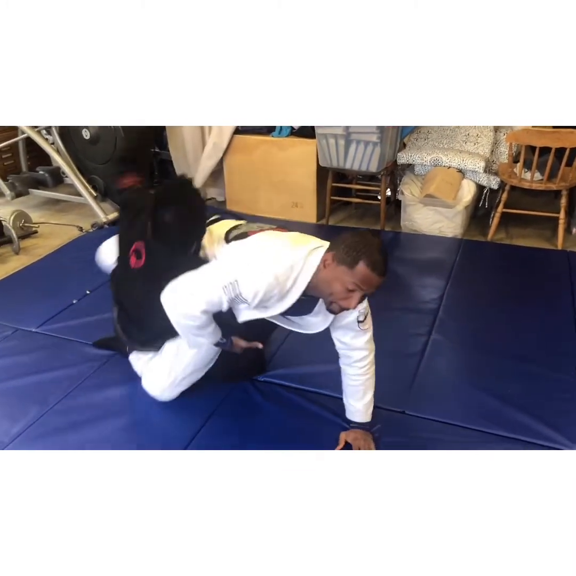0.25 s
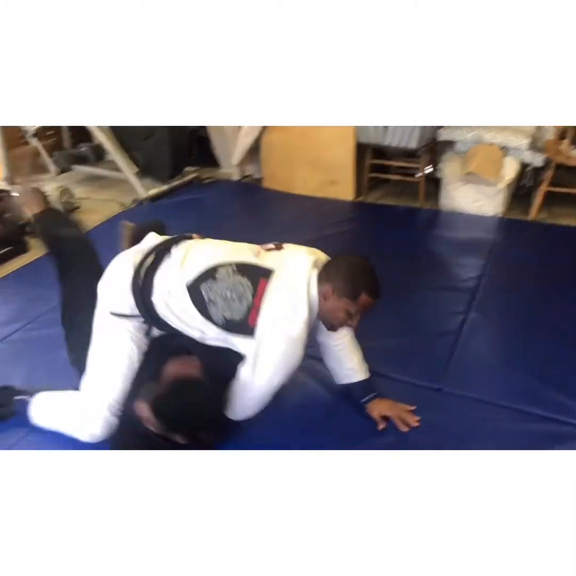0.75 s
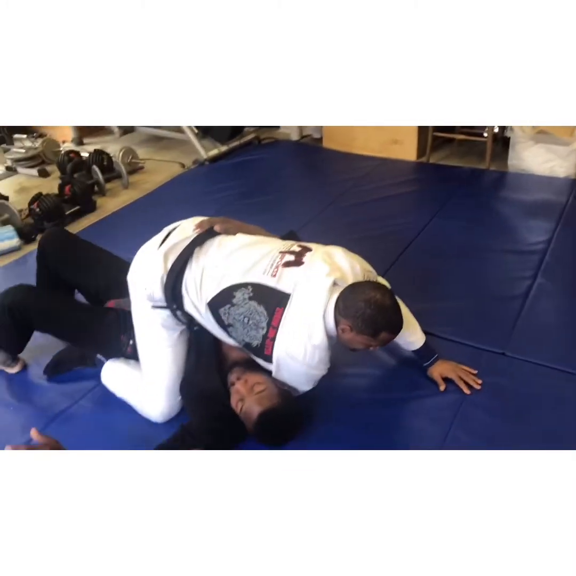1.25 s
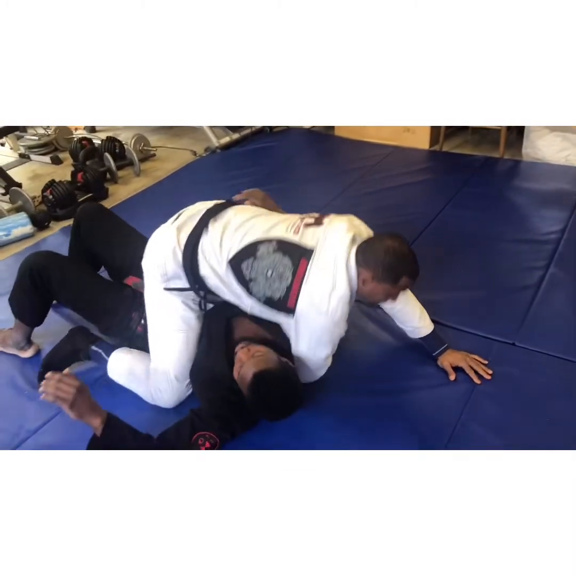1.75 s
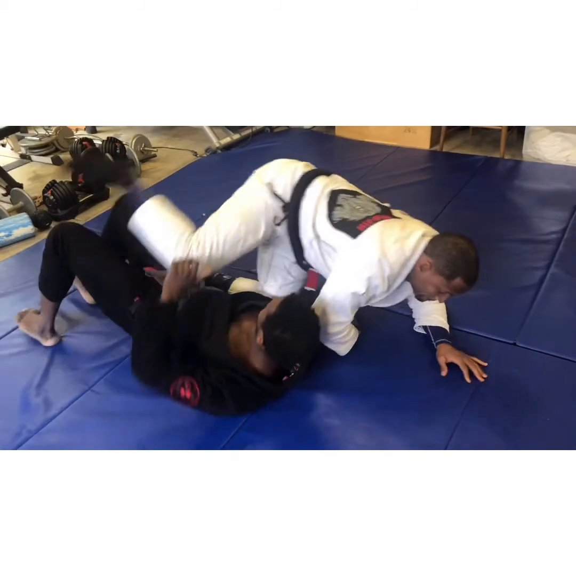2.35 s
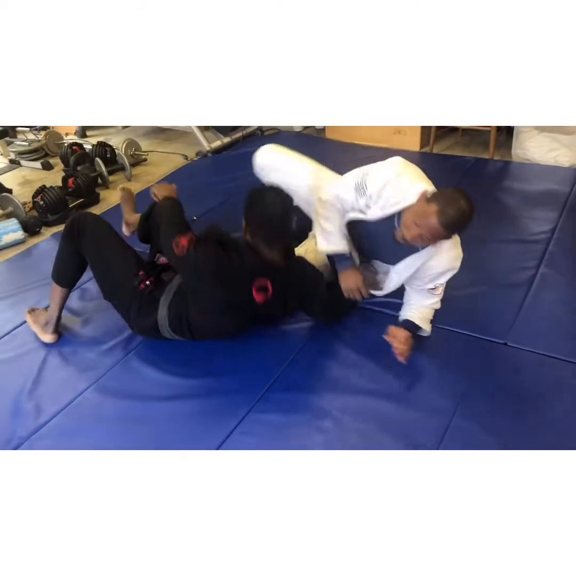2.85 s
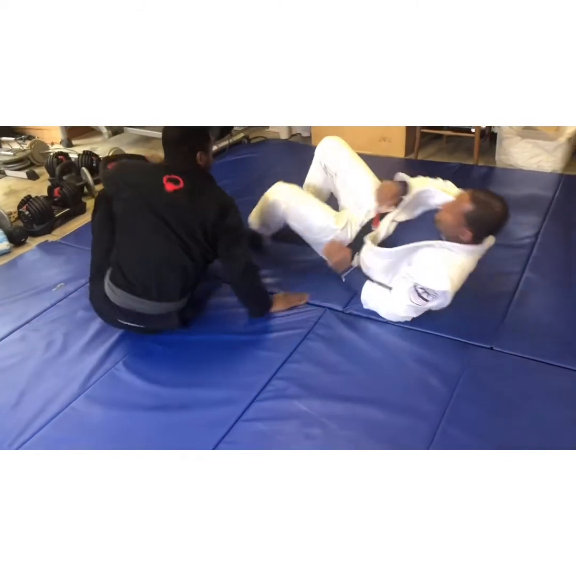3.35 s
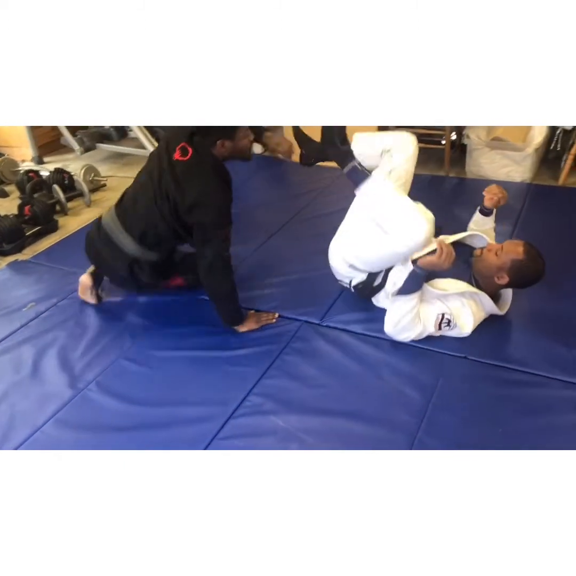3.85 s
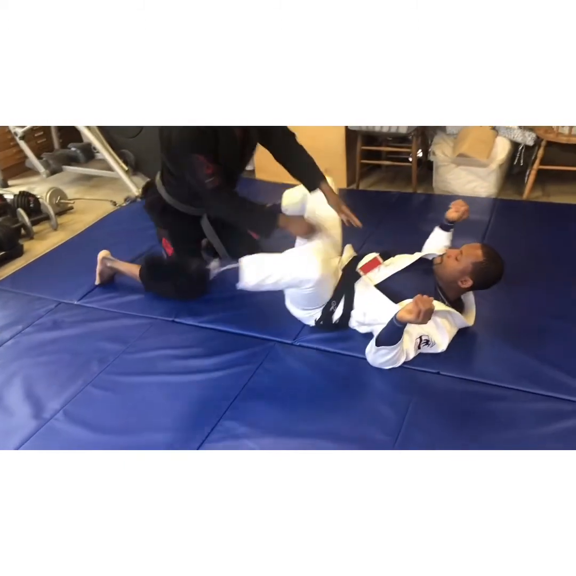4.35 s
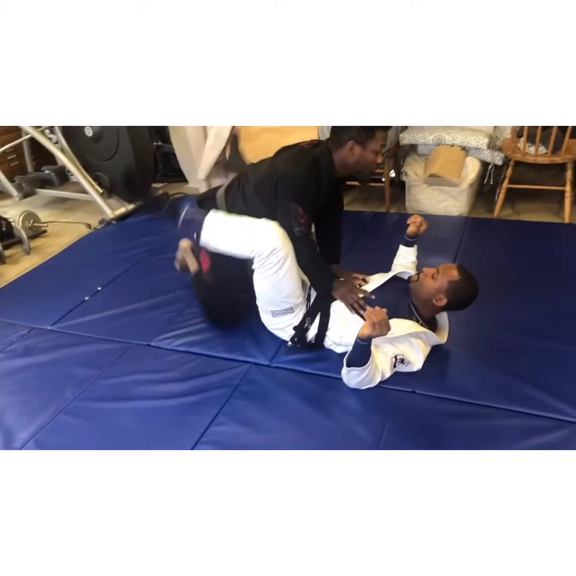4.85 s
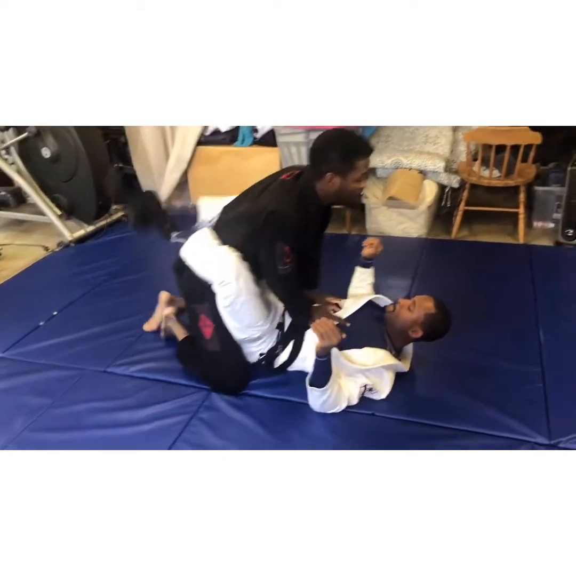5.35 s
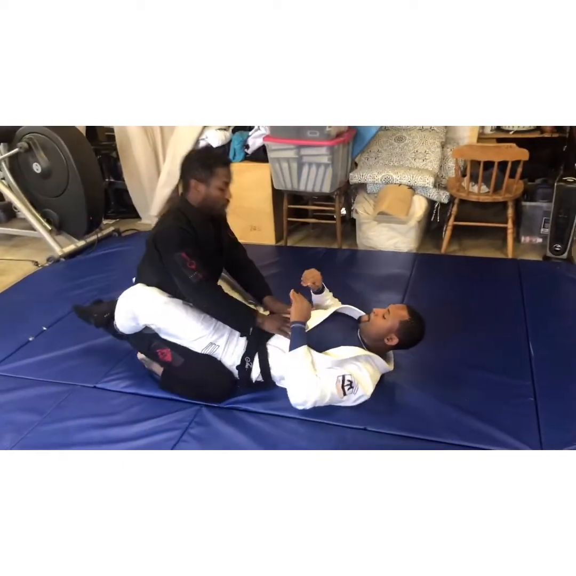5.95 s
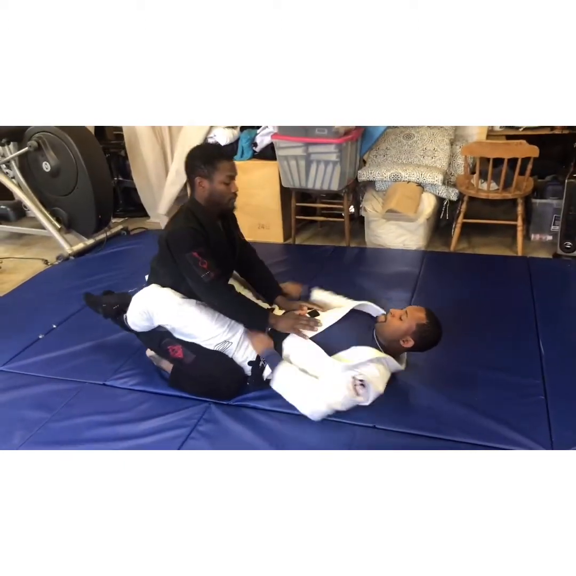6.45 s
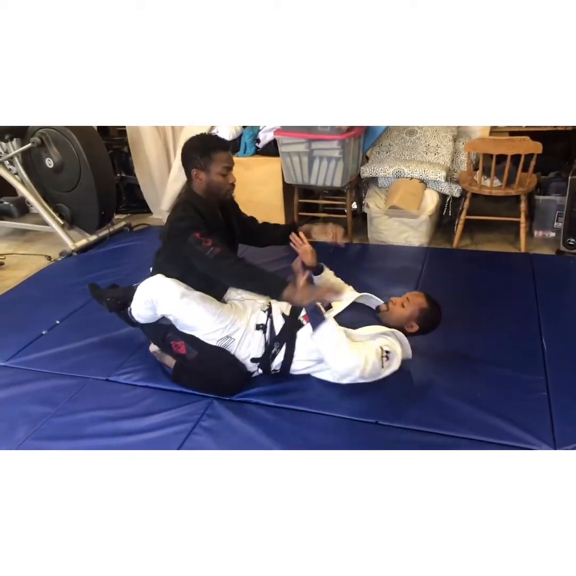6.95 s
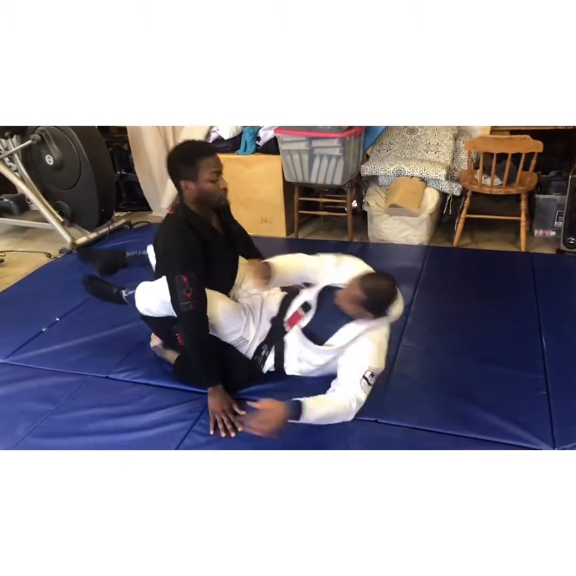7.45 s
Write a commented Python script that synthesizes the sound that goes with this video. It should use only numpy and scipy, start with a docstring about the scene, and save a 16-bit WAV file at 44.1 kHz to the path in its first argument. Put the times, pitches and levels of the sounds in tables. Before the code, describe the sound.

A heavy double slam onto mats near the start, followed by scuffling cotton jackets, soft knee and hand thuds, quiet gripping and a late thud.

```python
"""A cluttered basement room: two grapplers roll on foam mats near a phone microphone.
Bodies and limbs land as resonant noise bursts that ring decaying floor modes under the mats.
Heavy cotton jackets snap as short pitched bursts; they crumple, rasp and slide over the vinyl
as stick-slip noise, with low drag and rumble; one level curve, dipping after the big slam, steers them.
Decaying noise tails make the room answer each blow and snap; a faint air noise lies under it all."""
import sys
import numpy as np
from scipy import signal
from scipy.fft import rfft, irfft, next_fast_len
from scipy.io import wavfile
from scipy.ndimage import uniform_filter1d

SR = 44100
rng = np.random.default_rng(int(sys.argv[2]) if len(sys.argv) > 2 else 0)


def int16_out(signal):
    """Quantize to a 16-bit WAV file."""
    q = np.round(np.clip(np.atleast_2d(signal).T, -1, 1) * 32767)
    wavfile.write(sys.argv[1], SR, q.astype(np.int16))


N = 340011  # samples
REF_DB = -50  # reference for the rubbing level and for the slide hiss

# jackets gripped and wrung: (hardest at [s], crumpling level [dB], tightening [s], easing [s],
# seam rasp level [dB])
GRIPS = [(.02, -55, .04, 0.12, -55.5), (.32, -47, 0.066, 0.11, -57), (.58, -47, .04, 0.038, -47),
         (2.7, -46, 0.062, 0.065, -52.5), (3.06, -52, 0.045, 0.044, -71), (3.57, -46, 0.42, 0.057, -57),
         (3.92, -44.5, 0.074, 0.1, -55), (4.45, -63, .03, 0.067, -55), (4.72, -56, .015, 0.022, -60),
         (5.31, -51, 0.064, .04, -68), (5.42, -52.5, .04, 0.089, -51), (5.52, -48, 0.068, 0.023, -60),
         (5.65, -47.5, 0.024, 0.061, -57), (6.3, -60.5, 0.037, .04, -64), (6.51, -59.5, 0.16, 0.089, -62.5),
         (6.9, -54.5, 0.031, .07, -56.5), (7.25, -54, 0.034, 0.067, -49.5),
         (7.42, -45.5, 0.036, 0.14, -51.5)]


def amp(db):
    """Logarithmic level: decibels to amplitude gain."""
    return 10 ** (np.asarray(db) / 20)


def unit(x):
    """Power normalisation: scaled to rms 1."""
    return x / np.sqrt(np.mean(x ** 2) + 1e-20)


def peaked(x):
    """Peak normalisation: scaled to peak 1."""
    return x / np.abs(x).max()


def along(points, hz):
    """Log-frequency interpolation of (frequency [Hz], value) points."""
    f, v = np.transpose(points)
    return np.interp(np.log(hz + 1), np.log(f + 1), v)


def filtered(x, response):
    """Linear filtering: the spectrum of x times a response of frequency."""
    m = next_fast_len(len(x) + 8192)
    hz = np.fft.rfftfreq(m, 1 / SR)
    return irfft(rfft(x, m) * response(hz), m)[:len(x)]


def resonance(centre_hz, q):
    """Simple resonator: a causal second-order band-pass of peak gain 1."""
    def response(f):
        damping = 1j * f * centre_hz / q
        return damping / (centre_hz ** 2 - f * f + damping)
    return response


def friction(spectrum, grains_per_s, grain_s, grain_share, patchy_db):
    """Stick-slip friction: patchy noise and random slip bursts in one spectral colour, rms 1."""
    z = signal.stft(rng.standard_normal(N + 512), nperseg=512)[2]
    field = uniform_filter1d(rng.standard_normal(z.shape), size=8, axis=0)  # smooth over frequency
    field = uniform_filter1d(field, size=5, axis=1)  # and over time
    noise = signal.istft(z * amp(patchy_db * unit(field)), nperseg=512)[1][:N]

    starts = (rng.random(N) < grains_per_s / SR) * amp(-14 * rng.random(N))
    slips = signal.lfilter([1], [1, -np.exp(-1 / (grain_s * SR))], starts)  # sudden start, quick fade
    bursts = slips * rng.standard_normal(N)

    share = np.clip(grain_share, 0, 1)  # of the power
    mix = np.sqrt(1 - share) * unit(noise) + np.sqrt(share) * unit(bursts)
    return unit(filtered(mix, lambda hz: amp(along(spectrum, hz))))


def swells(rows):
    """Incoherent addition: gain of (peak [s], level [dB], rise [s], fall [s]) bells, powers summed."""
    t = np.arange(0, N, 32) / SR
    power = np.zeros(len(t))
    for s, db, rise, fall in rows:
        flank = np.where(t < s, rise, fall)
        power += amp(2 * db) * np.exp(-2 * ((t - s) / flank) ** 2)
    return np.interp(np.arange(N) / SR, t, np.sqrt(power))


def room(x):
    """Diffuse reverberation: x through a fresh noise tail of energy 1, decaying by frequency."""
    # reverberation of the room: (frequency [Hz], 60 dB decay time [s])
    decay_times = [(100, 0.24), (500, 0.39), (2000, 0.48), (6000, 0.47), (15000, 0.3)]
    hz, t, z = signal.stft(rng.standard_normal(SR // 2), SR, nperseg=256)
    t60 = np.maximum(along(decay_times, hz), .05)[:, None]
    tail = signal.istft(z * amp(-60 * t / t60), SR, nperseg=256)[1]
    tail *= 1 - np.exp(-np.arange(len(tail)) / SR / 0.0044)  # reflections thicken
    return signal.fftconvolve(x, tail / np.linalg.norm(tail))[:len(x)]


def knock(envelope, centre_hz, q, push):
    """Impulsive excitation: a push and its noise through one resonance applied twice, peak 1."""
    force = envelope * rng.standard_normal(len(envelope))
    force[0] = push * np.linalg.norm(force)
    return peaked(filtered(force, lambda f: resonance(centre_hz, q)(f) ** 2))


def air():
    """Stationary background noise: the quiet room and the microphone's own hiss."""
    # colour of the background: (frequency [Hz], relative level [dB])
    air_spectrum = [(15, -41), (25, -48), (59, -7.5), (108, -43.5), (123, -15.5), (145, 14), (166, 11),
                    (1130, -19), (2610, -19), (16000, -50)]
    return amp(-67) * friction(air_spectrum, 18, grain_s=.01, grain_share=.02, patchy_db=-1.7)


def level_over_reference():
    """Level envelope: the course of the rubbing as heard, in dB over REF_DB."""
    # level of the rubbing as heard, dipping after the big slam: (time [s], level [dB])
    rubbing_level = [(0, -45), (.2, -48), (.42, -45.5), (.51, -50), (.62, -39), (.78, -29.5), (.86, -49),
                     (.93, -47), (1.1, -48.5), (1.299, -78), (1.49, -72.5), (1.58, -56.5), (1.97, -53),
                     (2.08, -51), (2.18, -56), (2.3, -50.5), (2.64, -48.5), (3.3, -47), (3.62, -43.5),
                     (3.67, -55), (3.75, -53), (3.92, -44.5), (4.11, -55.5), (4.24, -61.5), (4.28, -56),
                     (4.44, -46), (4.78, -58), (4.88, -53.5), (4.92, -47.5), (5.04, -45), (5.12, -54.5),
                     (5.3, -49), (5.751, -48.5), (5.95, -66), (6.771, -61), (6.85, -62.5), (7.14, -50.5),
                     (7.19, -39), (7.33, -47.5), (7.4, -40), (7.55, -43.5), (7.71, -47.5)]
    return np.interp(np.arange(N) / SR, *np.transpose(rubbing_level)) - REF_DB


def weight_drag(over_db):
    """Sliding friction under load: dragged weight gives low noise that follows the level dB for dB."""
    # colour of the drag: (frequency [Hz], relative level [dB])
    drag_spectrum = [(65, -45.5), (110, -7), (242, -2.5), (282, -0.5), (324, -2.5), (493, -3),
                     (1200, -11.5), (1560, -23.5), (2640, -120)]
    rub = friction(drag_spectrum, 30, grain_s=.01, grain_share=.15, patchy_db=2.5)
    return amp(-49 + over_db) * rub


def cotton_crumple(over_db):
    """Buckling of folds: gripped cotton crackles in many short bursts."""
    # colour of the folds: (frequency [Hz], relative level [dB])
    crumple_spectrum = [(400, -18.5), (700, 0), (1000, -3), (1600, -2), (2600, -15), (6000, -36),
                        (12000, -69)]
    grips = swells([row[:-1] for row in GRIPS])
    folds = np.hypot(amp(-53.5 + 0.73 * over_db), grips)
    crackle = friction(crumple_spectrum, 110, grain_s=0.0052, grain_share=0.47, patchy_db=-1.7)
    return folds * crackle


def cloth_slide(over_db):
    """Speed-dependent friction: cloth hisses along vinyl, and fast slides sound brighter."""
    # slides along the vinyl: (fastest at [s], hiss level [dB], speed-up [s], slow-down [s])
    slide_events = [(.1, -54.5, 0.063, 0.087), (.55, -52.5, 0.23, 0.11), (.95, -51.5, 0.062, 0.18),
                    (1.55, -57.5, 0.062, .2), (1.9, -58.5, 0.31, 0.14), (2.13, -53, 0.069, 0.11),
                    (2.35, -63, 0.091, 0.046), (2.53, -58, .03, 0.044), (2.68, -59, 0.023, 0.2),
                    (3.0, -47, 0.14, 0.26), (3.27, -53.5, 0.14, 0.044), (3.87, -54.5, 0.028, .06),
                    (4.03, -58.5, 0.12, 0.2), (4.3, -58.5, 0.03, 0.11), (4.5, -54, 0.17, 0.081),
                    (4.93, -56, 0.013, 0.25), (5.2, -56.5, 0.093, 0.083), (5.35, -59, 0.11, 0.19),
                    (5.65, -58.5, 0.042, 0.076), (6.48, -61.5, 0.068, 0.25), (6.9, -58.5, 0.1, 0.3),
                    (7.18, -50.5, 0.056, 0.1), (7.45, -55, 0.15, 0.069)]
    # colour of the hiss: (frequency [Hz], relative level [dB])
    hiss_spectrum = [(1470, -15.5), (2500, -5.5), (3830, -2.5), (6150, -3.5), (7470, -4), (12800, -7.5),
                     (16000, -10.5)]
    # brighter colour of fast slides: (frequency [Hz], relative level [dB])
    fizz_spectrum = [(2940, -38), (5000, -18), (7450, 0.5), (10100, 2.5), (15000, 4.5), (16000, -5)]
    fizz_spectrum = [(3000, -38.5)] + list(fizz_spectrum)  # flat below 3 kHz
    slides = swells(slide_events)
    fizz_gain = amp(-54.5) * (slides / amp(REF_DB)) ** 1.2  # 1.2 dB per dB of hiss
    fizz = fizz_gain * friction(fizz_spectrum, 40, grain_s=.004, grain_share=.05, patchy_db=0.5)
    hiss_gain = np.hypot(amp(-63 + 0.32 * over_db), slides)
    hiss = hiss_gain * friction(hiss_spectrum, 40, grain_s=.004, grain_share=0.041, patchy_db=2.34)
    return hiss + fizz


def floor_rumble(over_db):
    """Low-frequency structural excitation: weight shifting on the floor makes it rumble."""
    # shifts of weight: (heaviest at [s], rumble level [dB], loading [s], unloading [s])
    heaves = [(.02, -65, .04, .05), (.6, -53.5, 0.097, .08), (.88, -41, .14, 0.15),
              (2.69, -55, 0.025, 0.078), (4.44, -59, .12, 0.23), (5.1, -64, .1, 0.14),
              (5.45, -62.5, .15, 0.24), (7.22, -58.5, 0.051, 0.094), (7.52, -61, 0.13, 0.09)]
    # colour of the rumble: (frequency [Hz], relative level [dB])
    rumble_spectrum = [(20, -41), (40, -11.5), (65, 12.5), (110, 3), (160, -17), (300, -48)]
    load = np.hypot(amp(-74 + 0.17 * over_db), swells(heaves))
    return load * friction(rumble_spectrum, 7.3, grain_s=0.027, grain_share=0.22, patchy_db=-0.5)


def seam_rasp(over_db):
    """Stick-slip of rough edges: seams rasp as the jackets are gripped and wrung."""
    # colour of the seams: (frequency [Hz], relative level [dB])
    rasp_spectrum = [(1000, -34.5), (1800, -3), (2500, -2), (3500, -5.5), (6000, -13.5), (12000, -42.5)]
    grips = swells([(s, rasp_db, rise, fall) for s, _, rise, fall, rasp_db in GRIPS])
    seams = np.hypot(amp(-58.5 + 0.53 * over_db), grips)
    return seams * friction(rasp_spectrum, 90, grain_s=0.0056, grain_share=0.1, patchy_db=2.0)


def rubbing():
    """Superposition of friction sources: five layers share one level envelope."""
    over_db = level_over_reference()
    cloth = cotton_crumple(over_db) + cloth_slide(over_db) + seam_rasp(over_db)
    return weight_drag(over_db) + cloth + floor_rumble(over_db)


def landings():
    """Impact and modal response: each landing squeezes foam, slaps vinyl and rings floor modes."""
    # hands, knees and feet set down: (time [s], level [dB], contact colour [Hz], press time [s])
    steps = [(0.267, -28.5, 510, 0.077), (1.527, -37, 792, 0.065), (1.805, -37, 470, 0.059),
             (1.857, -32.5, 940, 0.11), (1.985, -24.5, 900, 0.045), (2.006, -20, 358, 0.092),
             (2.05, -40, 400, 0.073), (2.258, -33.5, 288, 0.079), (2.371, -27.5, 430, 0.038),
             (2.455, -33.5, 400, 0.046), (2.508, -35, 412, 0.066), (2.58, -23.5, 328, .03),
             (2.633, -31.5, 775, .05), (2.659, -28.5, 180, 0.087), (2.807, -28.5, 291, 0.049),
             (2.844, -34, 291, .06), (2.88, -30, 352, 0.035), (2.935, -30, 380, .05),
             (3.009, -29, 506, .04), (3.0445, -19.5, 514, 0.028), (3.074, -23, 613, 0.027),
             (3.11, -33.5, 366, .05), (3.176, -26, 198, 0.1), (3.769, -26.5, 790, 0.13),
             (3.784, -26, 780, .1), (3.87, -27, 851, 0.12), (3.939, -27.5, 560, 0.075),
             (4.257, -36.5, 560, 0.14), (4.285, -32, 554, .12), (4.396, -31.5, 173, .07),
             (4.794, -28.5, 460, 0.089), (4.826, -32, 188, 0.07), (4.897, -17.5, 364, 0.065),
             (4.959, -26.5, 300, 0.11), (5.659, -31, 603, 0.07), (5.73, -26.5, 684, 0.054),
             (6.402, -42, 221, 0.094), (6.511, -46, 168, .07), (6.733, -43, 553, 0.08),
             (6.877, -43, 183, 0.065), (7.012, -55, 397, .06), (7.168, -23.5, 300, 0.052)]
    # a trunk or arm falling flat: (time [s], level [dB], contact colour [Hz], relative floor ring [dB],
    # relative vinyl slap [dB], press time [s], relative room level [dB])
    falls = [(.63, -20, 283, -13, -18.5, .06, -8.5), (.6585, -5.5, 791, -8.5, 7, 0.03, -6.5),
             (.664, 2, 386, -6.5, -20, 0.057, -4.5), (.688, -8, 385, 2, 1, 0.16, -3.5),
             (.869, -9, 717, -20.1, -4, 0.27, -5), (.884, -10.5, 216, -8, -6.5, 0.095, -3.5),
             (.904, -13.5, 744, -25, -1, 0.1, -3.5), (7.55, -15, 425, -24, -5.5, 0.08, -13),
             (7.565, -6.5, 287, -23, -8.5, 0.04, -1.5), (7.602, -19, 272, -21, -18, 0.066, -16),
             (7.628, -20, 270, -19, -19, 0.038, -14)]
    # modes of slab and room: (frequency [Hz], relative level [dB], 60 dB decay time [s])
    floor_modes = [(62, -11, 0.38), (98, -2.5, 0.23), (125, 4, 0.22), (183.7, -1.5, 0.37),
                   (266.4, -9.5, 0.27), (292, -9.5, 0.48), (398.7, -3.5, 0.31), (464, -4, 0.19),
                   (533, -12, 0.32), (634, -10.5, 0.43), (720, 4.5, 0.069), (856, -9, 0.17)]
    # colour of the vinyl slap: (frequency [Hz], relative level [dB])
    slap_spectrum = [(300, -21), (900, -1.5), (2500, -4.5), (6000, -11), (16000, -18.5)]

    out, t = np.zeros(N + SR), np.arange(SR // 2) / SR
    mode_hz = np.transpose(floor_modes)[0]
    modes = np.array([amp(level - 60 * t / t60) * np.sin(2 * np.pi * hz * t)
                      for hz, level, t60 in floor_modes])
    modes = modes * (1 - np.exp(-t / 0.0062))  # the floor takes time to move

    # each blow gains the drive of the upper modes [dB] and the contact's Q
    blows = [(*row, -16, 1.53) for row in falls]
    for s, db, colour_hz, press in steps:
        room_db = -17 + 143.5 * press  # slow, heavy contacts fill the room more
        blows.append((s, db, colour_hz, -31, -18, press, room_db, -16, 1.3))

    for s, db, colour_hz, ring_db, slap_db, press, room_db, body_db, q in blows:
        # the press time is a 60 dB decay
        squeeze = amp(-60 * t / np.clip(press, .01, .5)) * (1 - np.exp(-t / 0.0015))
        foam = knock(squeeze, colour_hz, q, push=0.32)
        vinyl = filtered(rng.standard_normal(len(t)), lambda hz: amp(along(slap_spectrum, hz)))
        contact = amp(-6) * foam + amp(slap_db - 5.5) * peaked(squeeze * vinyl)

        # weight shakes the deep slab modes; the upper ones answer near the contact's colour
        near = abs(resonance(colour_hz, q=2.5)(mode_hz))
        upper_drive = (amp(body_db) + amp(ring_db - 12.5)) * near
        drive = np.where(mode_hz < 160, amp(ring_db - 5.0), upper_drive)
        scatter = amp(rng.normal(0, 2, len(floor_modes)))  # 2 dB spread between blows
        ring = drive * scatter @ modes
        out[round(s * SR):][:len(t)] += amp(db) * (contact + amp(room_db) * room(contact) + ring)
    return out[:N]


def snaps():
    """Sudden release of tension: a fold pulled taut gives milliseconds of noise round one pitch."""
    # cloth snaps: (time [s], peak level before the room [dB], pitch [Hz])
    snap_events = [(.3147, -31.5, 1750), (.5771, -27.5, 2600), (.6012, -34, 1610), (0.6582, -9.5, 2580),
                   (0.6893, -35, 2690), (0.8703, -18, 1520), (1.4256, -41.5, 11700), (1.805, -33, 923),
                   (1.859, -41, 955), (2.053, -31, 740), (2.2127, -32, 1320), (2.2286, -32, 1610),
                   (2.2798, -33, 1520), (2.3156, -34.5, 1870), (2.37, -25.5, 1270), (2.457, -31, 836),
                   (2.511, -36.5, 1000), (2.58, -25.5, 1700), (2.7365, -44, 1810), (2.883, -30.5, 990),
                   (2.9142, -31, 1750), (3.0455, -25, 1440), (3.0795, -33, 1500), (3.296, -36, 3470),
                   (3.4545, -34.5, 2170), (3.5694, -32, 2000), (3.675, -30, 890), (3.7683, -30, 2120),
                   (3.8635, -32, 2070), (3.898, -28.5, 2500), (4.7947, -33.5, 1470), (4.896, -38, 800),
                   (5.2625, -35, 2040), (5.316, -29, 1390), (5.328, -29.5, 1170), (5.4236, -42, 1310),
                   (5.5125, -30.5, 1340), (5.635, -38, 1760), (5.732, -40, 1290), (6.758, -36, 1800),
                   (6.853, -37, 1420), (6.8764, -36, 1720), (6.9272, -35, 10940), (7.057, -40, 703),
                   (7.1748, -32.5, 1570), (7.204, -36, 1630), (7.2423, -33, 1560), (7.2552, -22.5, 1500),
                   (7.363, -26, 1540), (7.375, -26, 1640), (7.459, -30, 970), (7.5665, -20.5, 3120),
                   (7.6283, -28, 1830)]
    out, t = np.zeros(N + SR), np.arange(SR // 3) / SR
    envelope = amp(-60 * t / .008)  # falls 60 dB in 8 ms
    for s, db, pitch_hz in snap_events:
        q = np.clip(1.33 + 0.1 * (db + 30), .3, 6)  # louder snaps are narrower in band
        burst = amp(db) * knock(envelope, pitch_hz, q, push=0.55)
        out[round(s * SR):][:len(t)] += burst + amp(-7) * room(burst)
    return out[:N]


def scene():
    """Linear superposition: all sources add at one microphone."""
    return (air() + rubbing() + landings() + snaps())[None]


def record(dry):
    """Saturation and band limiting: loud peaks round off, then nothing stays above 15830 Hz."""
    soft = dry[0] / (1 + np.abs(dry[0] / .95) ** 6) ** (1 / 6)
    return filtered(soft, lambda hz: hz < 15830)[None]


dry = scene()
out = record(dry)
int16_out(out)
```